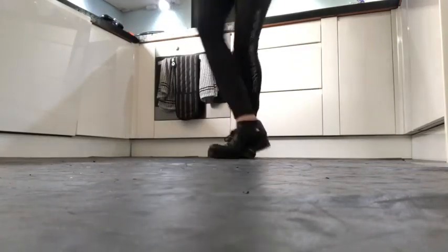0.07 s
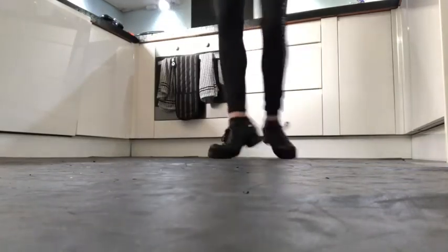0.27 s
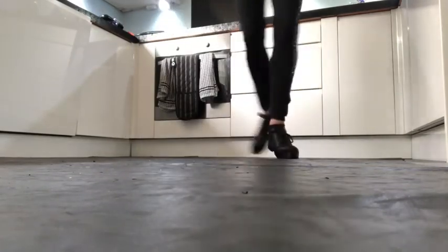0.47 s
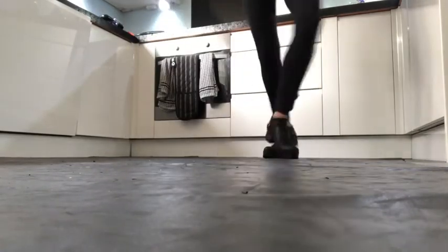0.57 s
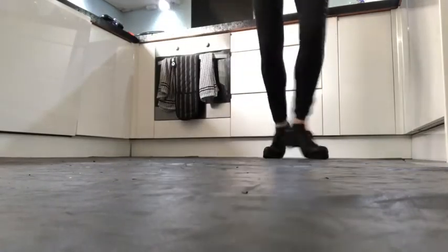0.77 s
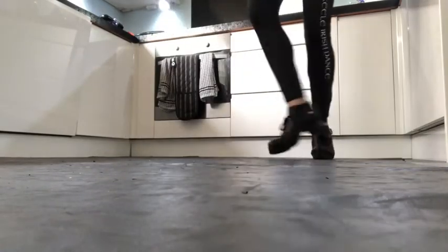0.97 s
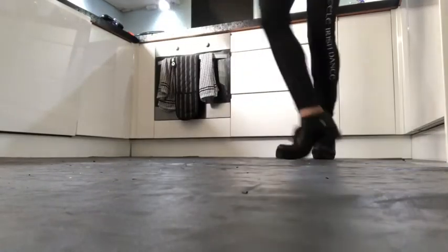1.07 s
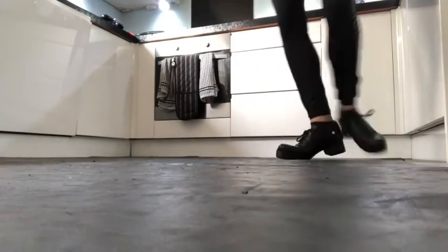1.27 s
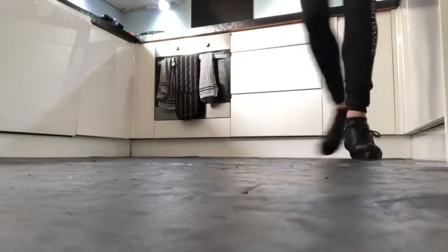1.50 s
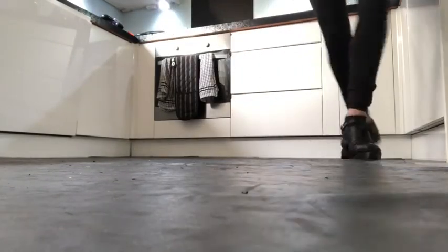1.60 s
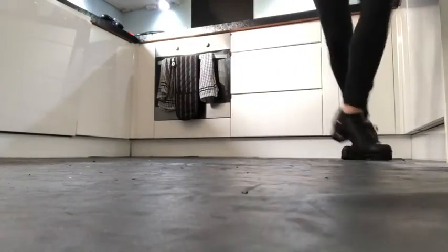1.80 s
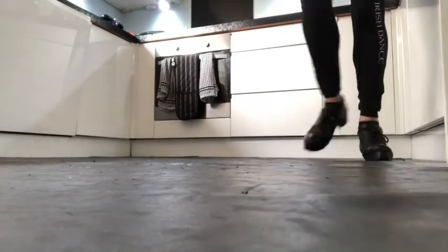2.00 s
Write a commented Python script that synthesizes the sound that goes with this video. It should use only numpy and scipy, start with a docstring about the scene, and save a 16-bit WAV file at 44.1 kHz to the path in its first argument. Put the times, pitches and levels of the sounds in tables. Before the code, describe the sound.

Sharp, loud clacks of hard dance shoes land close to a microphone on a kitchen floor, about four a second in an uneven rhythm. The floor booms softly underneath, soles brush faintly between steps, and the room rings briefly.

```python
"""Hard dance shoes strike a kitchen floor, close to a phone lying on it.
Each blow travels as a bending wave, treble first, and rings in the bare room.
The dancer's weight makes the floor boom. Laces tick and soles scuff between blows, over faint air noise.
The loudest peaks overload the microphone."""
import sys
import numpy as np
from scipy import signal
from scipy.fft import rfft, irfft
from scipy.io import wavfile
from scipy.ndimage import uniform_filter1d

SR = 44100
rng = np.random.default_rng(int(sys.argv[2]) if len(sys.argv) > 2 else 0)


def to_wav(s):
    """Save 16-bit WAV."""
    ch = np.atleast_2d(s).T  # columns
    pcm = np.round(np.clip(ch, -1, 1) * 32767)  # PCM
    wavfile.write(sys.argv[1], SR, pcm.astype(np.int16))


N = 90404
SIZE = 32768  # samples per event
FREQ_HZ = np.maximum(np.arange(SIZE // 2 + 1) * SR / SIZE, 1)
AGE_S = np.arange(SIZE) / SR

# heel and toe blows (time [s], bass re thud [dB], thud [dB], knock [dB], hollow re knock-clack mean [dB],
# clack [dB], knock pitch [Hz], contact cut-off [Hz], edge [dB], grit [dB], lag at 1 kHz [s], room [dB])
BLOWS = [(-.085, -18, 27.5, 35.5, 1, 26.5, 570, 2200, 10, 4.5, 0.0019, 0),
         (0.138, -21, 9.5, 4, 4.5, -1.5, 560, 1500, -27, -18, 0.0012, 0.5),
         (.2010, -8, 36.5, 43.5, -2.5, 27.5, 564, 1250, 20, 10.5, 0.002, 0),
         (.376, -13, 9, 5, 3, 2.5, 650, 2600, -23, -20, .002, 1),
         (0.4602, -9.5, 27, 37, 2, 29, 750, 2560, 11, 2, .0019, 3),
         (0.6363, -9, 32, 41.5, -4, 29.5, 622, 1770, -7, 3, 0.0028, 0.5),
         (.9605, -8, 26.5, 41.5, -3, 32, 723, 3240, 22, 11.5, .0018, -0.5),
         (1.2636, -19, 42.5, 39.5, -7.5, 35.5, 445, 1580, 22.5, 10.5, 0.0023, -1),
         (1.5088, -12, 30.5, 33.5, -2.5, 25, 776, 2270, -2, 3, 0.001586, 4),
         (1.66, -17, -2, 12, 8.5, 6, 770, 1600, -25, -17, 0.00185, 4.5),
         (1.7235, -27, 34, 25.5, 2, 23, 620, 1390, 8.5, 0.5, 0.0018, 2),
         (1.743, -19, 18, 29, 0.5, 12, 657, 1450, -15, -5, 0.0015, -0.5)]
# hard edge of the shoe tip, via the floor only (frequency [Hz], level [dB])
EDGE_SPECTRUM = [(700, -35), (1900, -24), (3400, -5.5), (5000, -30), (8000, -41), (16000, -38)]
# grit crushed under the sole (frequency [Hz], level [dB])
GRIT_SPECTRUM = [(300, -7.5), (2000, 1.5), (4200, -4.5), (7500, -14.5), (10000, -19.5), (16000, -30)]
# floor takes the dancer's weight (time [s], level [dB])
BOOMS = [(-.01, -26), (0.203, -21), (0.464, -25), (0.529, -27.5), (.655, -31.5), (0.966, -30.5),
         (1.04, -25.5), (1.272, -40), (1.554, -24.5), (1.728, -41.5)]
# floor resonances (frequency [Hz], level [dB], T60 [s])
FLOOR_MODES = [(90.8, 2.5, 0.36), (101.7, -7, 0.45), (75.4, -40, 0.27), (167.5, -13.5, 1)]
# loose boards (frequency [Hz], level [dB])
RUMBLE_SPECTRUM = [(25, -20), (55, -10), (90, 2), (130, -10), (170, -3), (300, -25), (1000, -52)]
# lace tips and eyelets (time [s], level [dB])
TICKS = [(.107, -8), (0.169, 9.5), (.174, 1), (0.206, 6), (.413, -9), (0.418, -2.5), (.429, -4),
         (0.4647, 9.5), (0.782, -6.5), (.801, -4), (.811, 0), (0.819, -3.5), (0.971, -3), (1.037, -5),
         (1.325, 0), (1.514, 4), (1.574, -17), (1.590, -23), (1.734, -3), (1.83, -12), (1.846, -4)]
# one lace tick (frequency [Hz], level [dB])
TICK_SPECTRUM = [(500, -23), (2500, -17.5), (3700, -7), (5200, -7), (7500, -11), (10500, -20), (16000, -26)]
# sole brushes (peak time [s], rise sigma [s], fall sigma [s], level [dB], scrape pitch [Hz])
SCUFFS = [(0.184, .012, .012, -42, 4000), (0.276, 0.013, 0.015, -38, 5200),
          (0.441, 0.014, 0.016, -47, 6500), (.565, 0.0085, 0.013, -44.5, 6940),
          (.685, 0.012, .03, -50, 4570), (0.81, 0.032, 0.014, -42, 8000), (1.295, 0.0091, 0.012, -40, 7140),
          (1.387, 0.043, 0.023, -36.5, 4900), (1.494, 0.0055, 0.019, -45.5, 3500),
          (1.576, 0.0035, 0.007, -36, 4030), (1.66, 0.055, 0.022, -45, 5470),
          (1.744, 0.017, 0.053, -47.5, 5500), (1.83, 0.013, 0.014, -38, 7300)]
# sole friction (frequency [Hz], level [dB])
SCUFF_SPECTRUM = [(300, 9), (1500, 4), (3000, -0.5), (4800, -5), (7500, -6.5), (10000, -10.5), (16000, -16)]
# reverberation (frequency [Hz], T60 [s])
ROOM_T60 = [(80, 0.18), (210, 0.35), (560, 0.46), (1470, 0.6), (3900, 0.72), (10000, 0.49)]
# room response (frequency [Hz], level [dB])
ROOM_SPECTRUM = [(40, -1), (125, -2), (170, 6), (300, 0), (470, 0.5), (600, -1.5), (800, -0.5), (1500, 0.5),
                 (4000, 2), (12000, 2)]
# standing waves (frequency [Hz], level [dB], T60 [s])
ROOM_MODES = [(166.8, -50.5, 0.26), (216.8, -49, 0.32), (461, -59, 0.43), (622, -59, 0.4),
              (736.5, -50, 0.13), (1293, -70, 1), (1450, -60, 0.34)]
# still room air (frequency [Hz], level [dB])
AIR_SPECTRUM = [(25, -28), (80, 0), (250, -1), (800, -5), (2000, -21.5), (5000, -23.5), (10000, -34),
                (16000, -42)]


def shoe_blows(echo_s=0.006, echo_db=-15.5, contact_order=4.3):
    """Heel and toe impacts, dulled by contact time, with crushed grit and a hard edge."""
    out = np.zeros(N)
    for start_s, *body, cutoff_hz, edge_db, grit_db, lag_s, room_db in BLOWS:
        contact = 1 / np.sqrt(1 + (FREQ_HZ / cutoff_hz) ** (2 * contact_order))
        blow = bending_wave(blow_spectrum(*body) * contact, lag_s)
        blow += undb(grit_db) * burst(GRIT_SPECTRUM, decay_s=0.0039)
        edge = bending_wave(undb(edge_db + curve(EDGE_SPECTRUM, FREQ_HZ)), lag_s)
        add(out, start_s, in_room(blow, room_db) + edge)
        add(out, start_s + echo_s, undb(echo_db) * blow)  # bending wave returning from the skirting
    return out


def blow_spectrum(bass_db, thud_db, knock_db, hollow_db, clack_db, knock_hz):
    """One impact: low thud, mid knock, clack, treble roll-off."""
    sub_hz, bass_hz, thud_hz, clack_hz = 60.4, 143, 246, 1310
    points = [(sub_hz, thud_db + bass_db - 16.5),
              (bass_hz, thud_db + bass_db),
              (thud_hz, thud_db),
              (np.sqrt(thud_hz * knock_hz), (thud_db + knock_db) / 2 - 1.5),
              (knock_hz, knock_db),
              (np.sqrt(knock_hz * clack_hz), (knock_db + clack_db) / 2 + hollow_db),
              (clack_hz, clack_db)]
    rolloff_db = -12.5 * np.maximum(np.log2(FREQ_HZ / clack_hz), 0)
    return min_phase(undb(curve(points, FREQ_HZ) + rolloff_db))


def bending_wave(spectrum, lag_s):
    """Floor dispersion: delay goes as 1/sqrt(f), so a pulse chirps downward."""
    dispersion = np.exp(-4j * np.pi * lag_s * np.sqrt(1000 * FREQ_HZ))
    return irfft(spectrum * dispersion) * (AGE_S < AGE_S[-1] / 2)


def floor_booms(rise_s=0.01, rumble_db=-8, rumble_decay_s=0.12):
    """The floor rings low and rumbles under the dancer's weight."""
    out, modes = np.zeros(N), ring(FLOOR_MODES)
    swell = 1 - np.exp(-(AGE_S / rise_s) ** 2)
    for start_s, level_db in BOOMS:
        rumble = undb(rumble_db) * noise(RUMBLE_SPECTRUM, SIZE) * np.exp(-AGE_S / rumble_decay_s)
        add(out, start_s, undb(level_db) * swell * (modes + rumble))
    return out


def lace_ticks():
    """Lace tips flick against the shoes."""
    out = np.zeros(N)
    for start_s, level_db in TICKS:
        add(out, start_s, undb(level_db) * burst(TICK_SPECTRUM, decay_s=0.00093))
    return in_room(out, room_db=-4.5)


def sole_scuffs(grain_db=4.5, scrape_db=7.5, scrape_width_oct=0.43):
    """Soles brush the floor: swells of grainy hiss with a broad scraping pitch."""
    out, t_s = np.zeros(N), AGE_S - AGE_S.mean()
    for peak_s, rise_s, fall_s, level_db, scrape_hz in SCUFFS:
        pressure = np.exp(-0.5 * (t_s / np.where(t_s < 0, rise_s, fall_s)) ** 2)
        grain = uniform_filter1d(rng.standard_normal(SIZE), size=30)
        rub = pressure * undb(level_db + grain_db * grain / grain.std()) * noise(SCUFF_SPECTRUM, SIZE)
        boost_db = scrape_db * np.exp(-0.5 * (np.log2(FREQ_HZ / scrape_hz) / scrape_width_oct) ** 2)
        add(out, peak_s + t_s[0], irfft(rfft(rub) * undb(boost_db)))
    return in_room(out, room_db=-4.5)


def kitchen_response(onset_s=0.0035, early_db=1.5, early_decay_s=0.03, lowest_hz=62.5, smooth_hz=93):
    """Room from one spot: early cupboard echoes, diffuse tail, standing waves."""
    white = rfft(rng.standard_normal(SIZE))
    octaves = np.clip(np.log2(FREQ_HZ / lowest_hz), 0, 8)
    onset = 1 - np.exp(-(AGE_S / onset_s) ** 4)
    early = 1 + undb(early_db) * np.exp(-AGE_S / early_decay_s)
    tail = np.zeros(SIZE)
    for octave in range(9):
        band = irfft(white * np.maximum(1 - abs(octaves - octave), 0))
        envelope = onset * early * decay(curve(ROOM_T60, lowest_hz * 2 ** octave))
        tail += band * envelope / np.linalg.norm(envelope)
    spectrum, bins = rfft(tail), int(smooth_hz * SIZE / SR)
    power = uniform_filter1d(uniform_filter1d(abs(spectrum) ** 2, bins), bins)
    gain = undb(curve(ROOM_SPECTRUM, FREQ_HZ)) / np.sqrt(power)  # evens out chance colouring
    return irfft(spectrum * min_phase(gain)) + ring(ROOM_MODES)


def in_room(sound, room_db):
    """Direct sound plus reverberation."""
    return sound + undb(room_db) * signal.fftconvolve(sound, kitchen_response())[:len(sound)]


def room_air(level_db=-45):
    """Still air: steady, dark noise."""
    return undb(level_db) * noise(AIR_SPECTRUM, N)


def undb(db):
    """Decibels to gain."""
    return 10 ** (np.asarray(db) / 20)


def curve(points, hz):
    """Interpolate (frequency [Hz], value) points over log frequency."""
    knots_hz, values = np.array(sorted(points)).T
    return np.interp(np.log(hz), np.log(knots_hz), values)


def add(out, start_s, sound):
    """Mix in at start_s, which may be negative."""
    offset = int(round(start_s * SR))
    part = sound[max(-offset, 0):max(N - offset, 0)]
    first = max(offset, 0)
    out[first:first + len(part)] += part


def min_phase(gain):
    """Spectrum of the most compact causal pulse with these gains."""
    cepstrum = irfft(np.log(np.maximum(gain, 1e-6)))
    cepstrum[1:SIZE // 2] *= 2
    cepstrum[SIZE // 2 + 1:] = 0
    return np.exp(rfft(cepstrum))


def noise(points, size):
    """Coloured noise, rms 1."""
    hz = np.maximum(np.fft.rfftfreq(size, 1 / SR), 1)
    coloured = irfft(rfft(rng.standard_normal(size)) * undb(curve(points, hz)), size)
    return coloured / coloured.std()


def burst(points, decay_s):
    """Short coloured noise burst."""
    white = rng.standard_normal(SIZE) * np.exp(-AGE_S / decay_s)
    colour = min_phase(undb(curve(points, FREQ_HZ)))
    return irfft(rfft(white / np.linalg.norm(white)) * colour)


def decay(t60_s):
    """Envelope falling 60 dB in t60_s."""
    return np.exp(-np.log(1000) * AGE_S / t60_s)


def ring(modes):
    """Sum of decaying sines."""
    return sum(undb(db) * np.sin(2 * np.pi * hz * AGE_S) * decay(t60_s) for hz, db, t60_s in modes)


def scene():
    """Dance over room air, mono."""
    return (shoe_blows() + floor_booms() + lace_ticks() + sole_scuffs() + room_air())[None]


def record(dry):
    """Microphone: soft clip at full scale, then low-pass."""
    knee, cutoff_hz = 9, 16000
    clipped = dry / (1 + abs(dry) ** knee) ** (1 / knee)
    return signal.sosfilt(signal.ellip(8, 0.1, 60, cutoff_hz, fs=SR, output="sos"), clipped)


dry = scene()
out = record(dry)
to_wav(out)
```